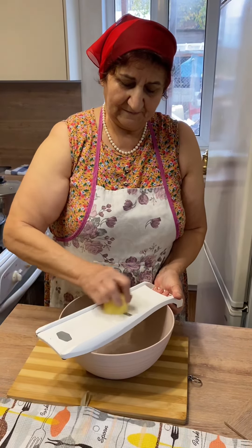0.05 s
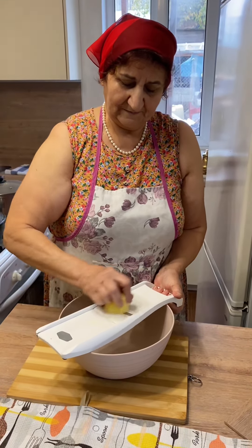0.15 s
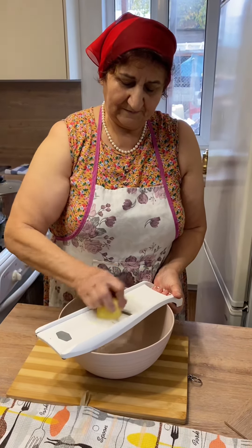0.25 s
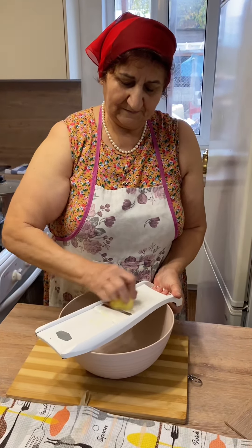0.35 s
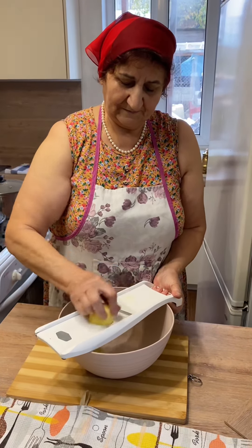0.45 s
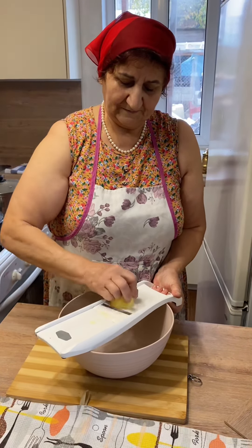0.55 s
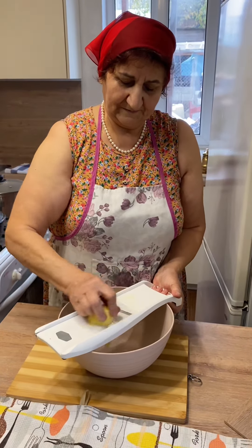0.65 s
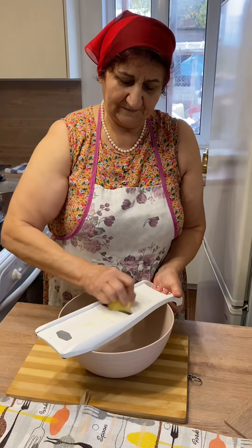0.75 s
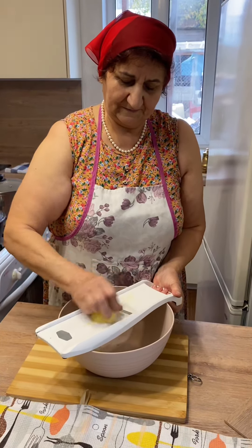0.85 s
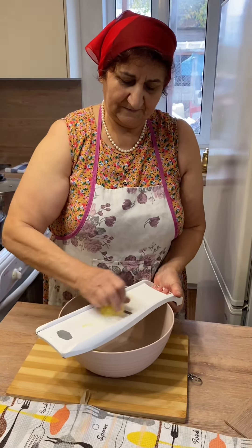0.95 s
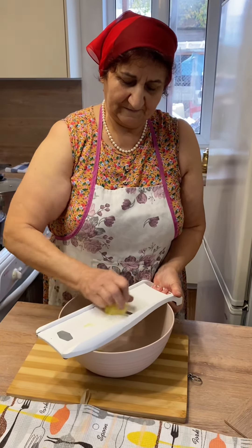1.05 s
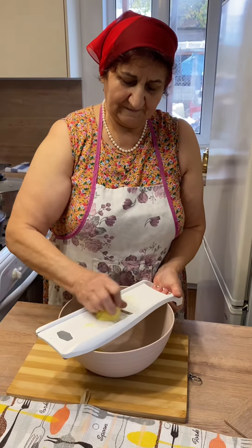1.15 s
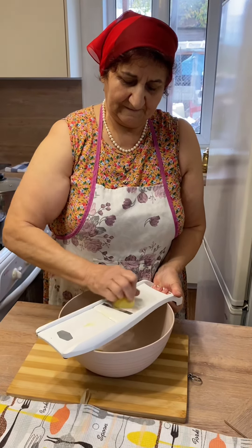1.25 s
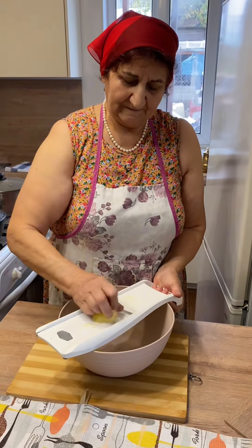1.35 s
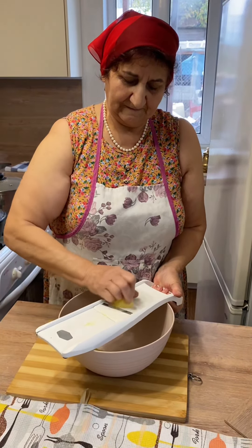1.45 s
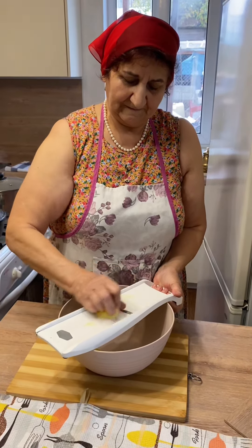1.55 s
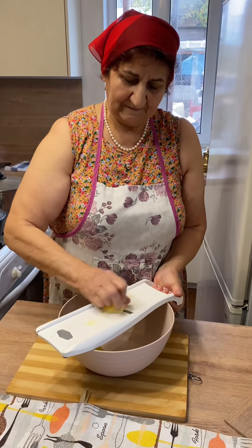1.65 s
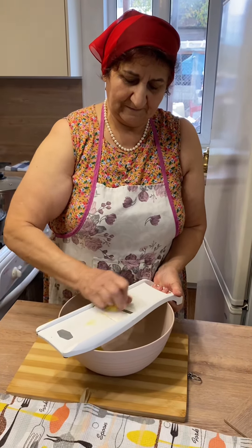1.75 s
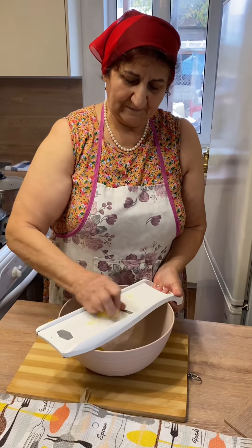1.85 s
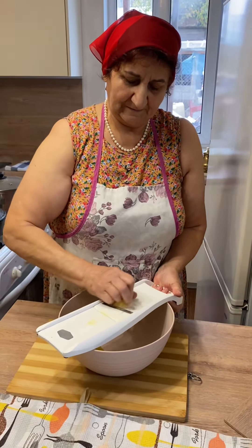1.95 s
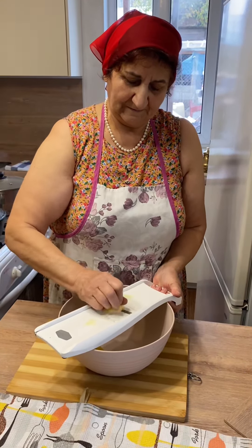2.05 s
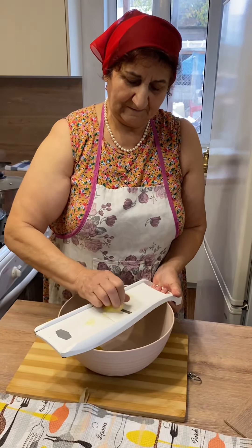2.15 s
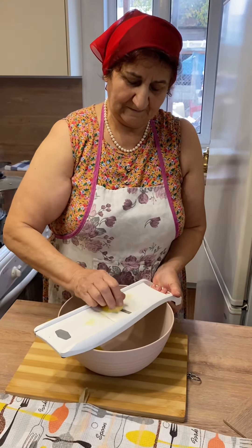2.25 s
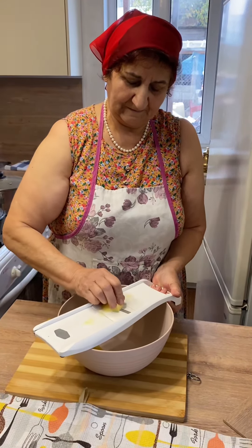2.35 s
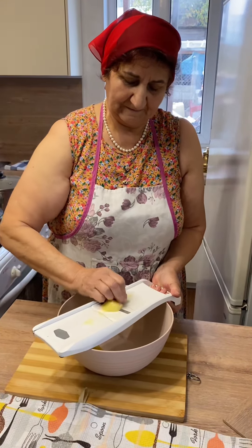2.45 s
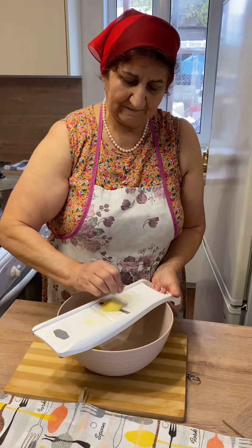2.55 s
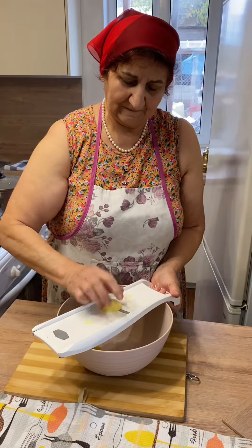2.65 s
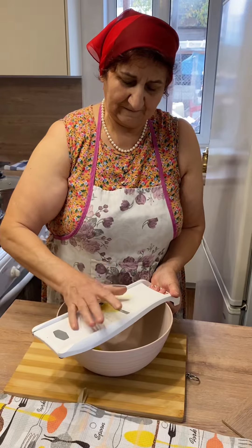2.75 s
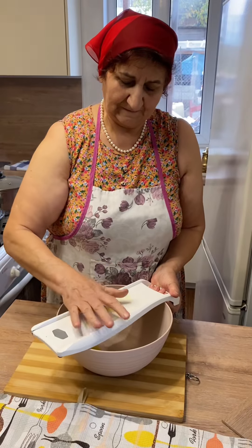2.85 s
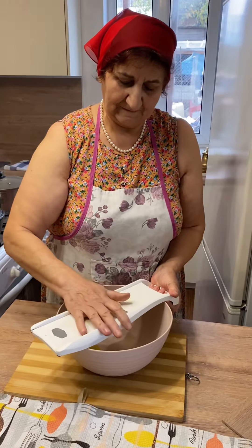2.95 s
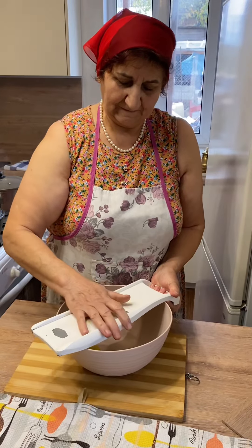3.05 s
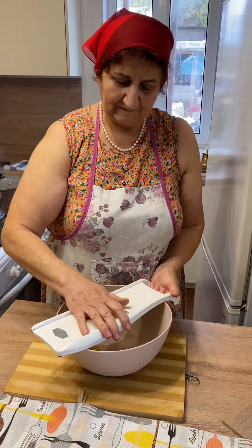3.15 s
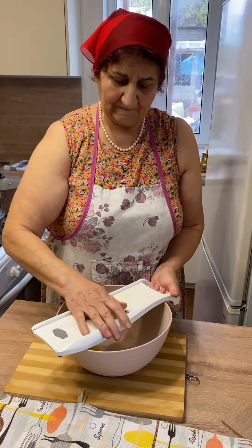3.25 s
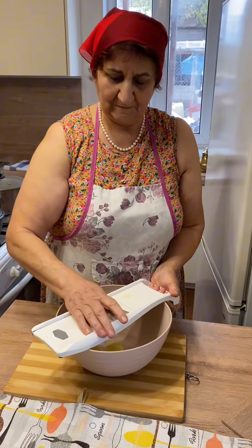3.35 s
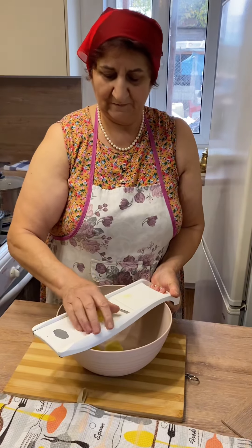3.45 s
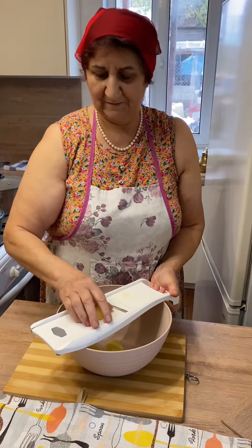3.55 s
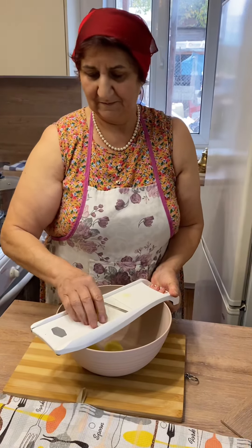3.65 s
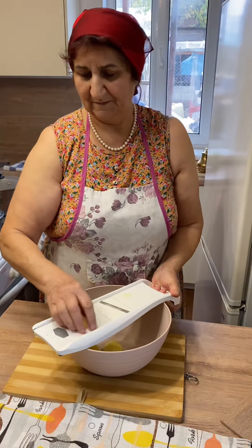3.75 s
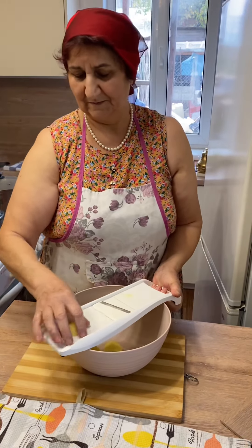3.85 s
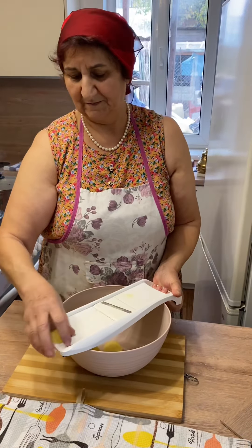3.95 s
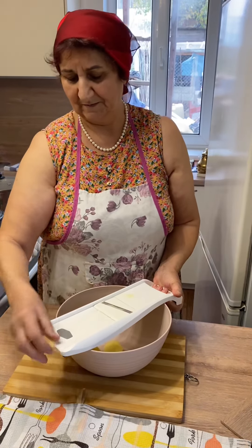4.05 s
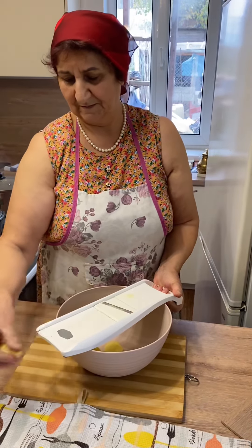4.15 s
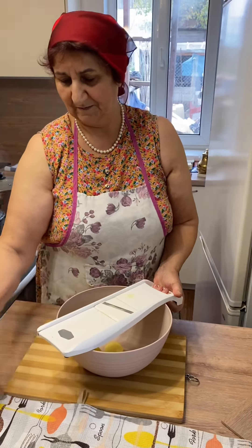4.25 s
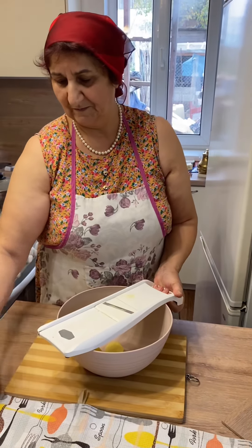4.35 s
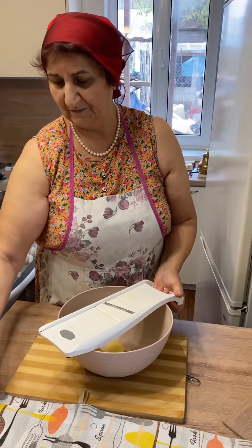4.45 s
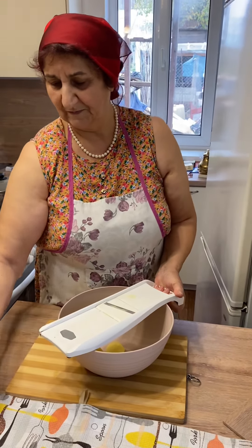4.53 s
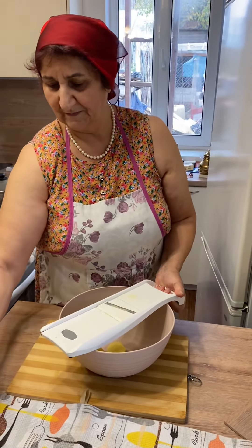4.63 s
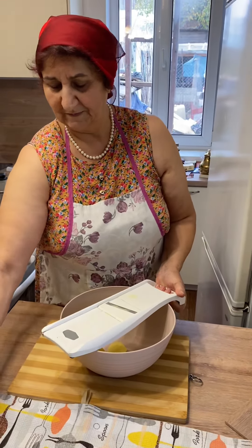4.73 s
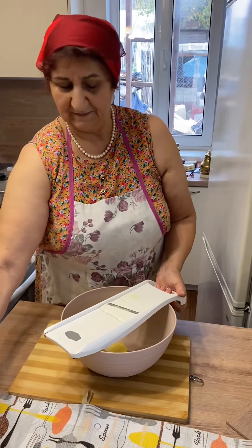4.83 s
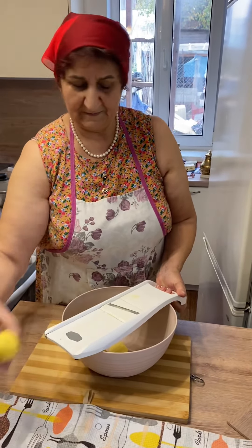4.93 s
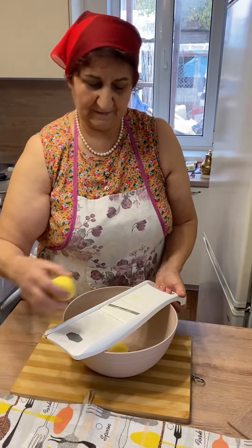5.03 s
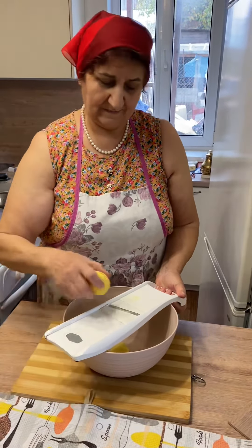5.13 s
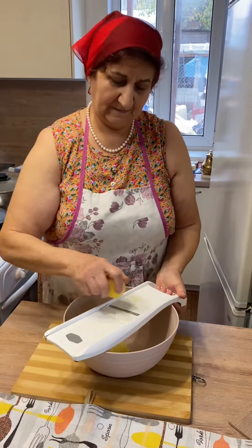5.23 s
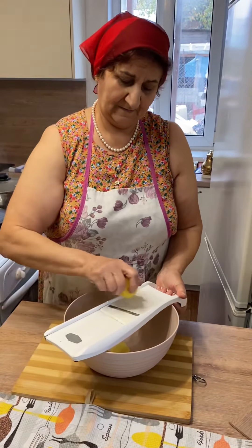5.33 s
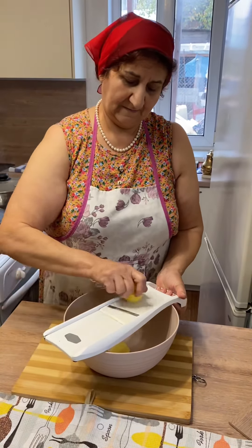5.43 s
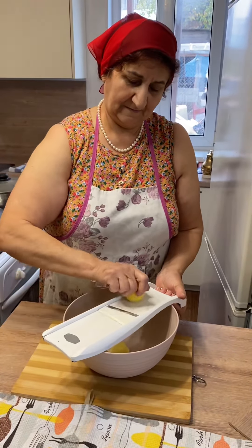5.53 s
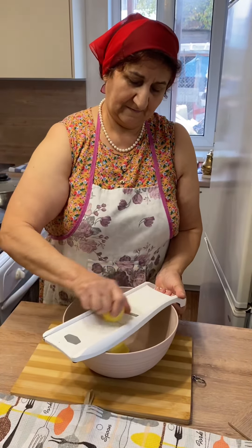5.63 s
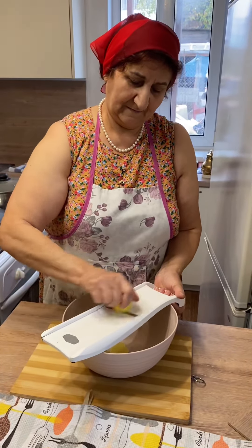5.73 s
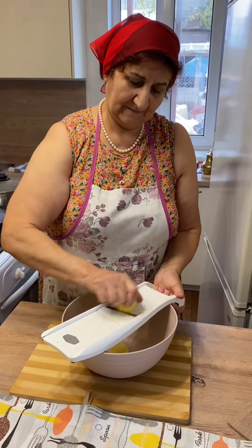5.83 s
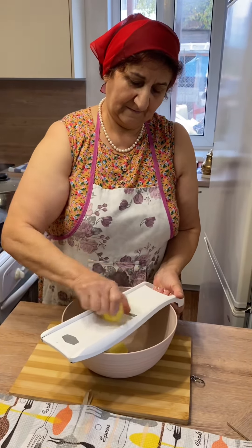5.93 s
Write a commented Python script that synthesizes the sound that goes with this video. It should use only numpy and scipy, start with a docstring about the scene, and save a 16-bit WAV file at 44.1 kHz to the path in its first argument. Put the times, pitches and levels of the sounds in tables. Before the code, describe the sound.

Fast wet scraping of a potato on a slicer knocking against a bowl, a pause with one clunk, then more slicing.

```python
"""Wet hissing strokes come first: a raw potato is rubbed fast up and down a ribbed plastic slicer that
rests on a bowl. Friction drives the modes of plate and bowl into a judder; the slicer thumps and booms
on the rim, and the blade snaps free of each slice. In a pause a hand brushes the slicer and a piece
drops into the bowl, then the strokes resume. A refrigerator hums in the small kitchen."""
import sys
import numpy as np
from scipy import signal
from scipy.fft import rfft, irfft, next_fast_len
from scipy.io import wavfile
from scipy.ndimage import uniform_filter1d, map_coordinates

SR = 44100
rng = np.random.default_rng(int(sys.argv[2]) if len(sys.argv) > 2 else 0)


def transcribe(signal):
    """Save signal, clipped to [-1, 1], as a 16-bit WAV file at the path in sys.argv[1]."""
    frames = np.atleast_2d(signal).T
    limited = np.clip(frames, -1, 1)
    pcm = np.round(limited * 32767).astype(np.int16)
    wavfile.write(sys.argv[1], SR, pcm)


N = 264159

# Event and mode levels are relative within each table.
# crisp catches, mostly the blade leaving a slice: t/s, level/dB, centre f/Hz, T60/s
BLADE_SNAPS = [(0.044, -32.5, 5560, 0.071), (0.105, -38, 5590, 0.037), (0.163, -53, 5300, 0.027),
               (0.2789, -26, 6340, 0.017), (0.383, -40, 5300, 0.027), (0.4969, -21, 6300, 0.022),
               (0.5875, -35.5, 4740, 0.038), (0.7178, -19.5, 5500, 0.026), (0.821, -34, 10100, 0.033),
               (0.9797, -41, 6330, 0.027), (1.049, -38, 5270, 0.056), (1.199, -42.5, 5530, .04),
               (1.2833, -39, 4650, 0.13), (1.482, -36, 4920, 0.028), (1.7549, -40, 5140, 0.035),
               (1.8833, -28.5, 6030, 0.036), (1.9826, -49, 5940, 0.045), (3.095, -41, 5270, 0.07),
               (3.3663, -25, 3630, 0.04), (3.7847, -45, 4680, 0.0283), (5.6127, -33, 9830, 0.024),
               (5.75, -47, 5300, 0.035), (5.854, -22, 6600, 0.041)]
# dull thumps of the slicer, from the strokes and from light handling in the pause:
# t/s, higher-mode level/dB, lower-mode level/dB, hard-edge level/dB
SLICER_THUMPS = [(0.008, -28.5, -27, -47), (0.091, -25, -41, -45), (0.112, -21.5, -37, -36),
                 (0.186, -51, -36, -47), (0.208, -26.5, -36, -57), (0.309, -31, -33, -51),
                 (0.335, -42, -25, -40), (0.362, -30, -35, -61), (0.388, -30, -31, -60),
                 (0.428, -35, -24, -45), (0.609, -36, -28, -41), (0.651, -48, -37, -53),
                 (0.773, -42, -39, -66), (0.867, -42, -30.5, -54), (0.905, -36, -27, -52),
                 (0.939, -41, -24, -47), (0.998, -44, -32, -60), (1.033, -38, -40, -64),
                 (1.107, -39, -28.5, -53.5), (1.148, -29.5, -40, -56), (1.258, -26.5, -41, -47),
                 (1.352, -38.5, -28.5, -59), (1.484, -22, -29, -42.5), (1.554, -27, -42, -57),
                 (1.719, -22, -41, -43), (1.731, -36, -33, -60.5), (1.809, -35, -45, -45),
                 (1.918, -28.5, -49, -52), (1.9452, -22, -35, -37), (1.982, -28.5, -37, -58),
                 (2.578, -62, -59, -57), (2.792, -58, -53, -54), (2.907, -43, -46, -53),
                 (3.053, -44, -40, -45), (3.309, -45, -47, -73), (5.452, -50, -36.5, -69),
                 (5.617, -33, -24, -46), (5.709, -52, -35, -66), (5.728, -46, -27, -60),
                 (5.755, -24.5, -18.5, -33), (5.764, -20.5, -30, -29), (5.776, -39, -49, -38),
                 (5.789, -42, -37, -40), (5.812, -36, -28, -44)]
# normal modes of the slicer plate and the empty bowl: f/Hz, bandwidth/Hz, level/dB
PLATE_MODES = [(225, 35, -4), (290, 22, 0), (345, 40, -3), (410, 18, -1), (480, 40, -8), (528, 14, 3),
               (573, 15, 2), (630, 50, -5), (735, 70, -9)]
UPPER_PLATE_MODES = [(800, 270, -3.5), (1176, 124, 1.5), (1303, 94, 2), (1763, 230, -3.5), (2052, 210, 1.4),
                     (2546, 140, -2), (2766, 145, -1), (3260, 2540, -9.5)]
BOWL_MODES = [(273, 59, -2.5), (377, 86, -3.5), (610, 190, -29), (894, 142, -1), (1120, 126, 2.5),
              (1247, 120, 1.5), (1327, 126, -2), (1760, 290, -4.5), (2040, 310, -3.5), (2770, 580, -1),
              (3500, 500, 6), (4460, 930, 4)]


def amp(db):
    """Amplitude ratio of a level in decibels."""
    return 10 ** (np.asarray(db) / 20)


def unit(x):
    """Normalisation to unit RMS."""
    return x / np.sqrt(np.mean(x ** 2) + 1e-20)


def along(points, hz):
    """Interpolation of (f/Hz, value) points on a logarithmic frequency axis."""
    f, value = np.transpose(points)
    return np.interp(np.log(hz + 1), np.log(f + 1), value)


def filtered(x, response):
    """Linear filtering: the spectrum is multiplied by a complex frequency response."""
    size = next_fast_len(N + SR // 2)
    return irfft(rfft(x, size) * response(np.fft.rfftfreq(size, 1 / SR)), size)[..., :N]


def tinted(x, spectrum):
    """Spectral shaping by (f/Hz, level/dB) points, at unit RMS."""
    return unit(filtered(x, lambda hz: amp(along(spectrum, hz))))


def resonant(x, modes, ratio=-1):
    """Modal superposition: mode k is weighted by ratio**k, so a positive ratio starts all in step."""
    return filtered(x, lambda f: sum(
        ratio ** k * amp(db) * 1j * f * width / (f0 * f0 - f * f + 1j * f * width)
        for k, (f0, width, db) in enumerate(modes)))


def shaken(force, gain, modes):
    """Forced vibration: the gain acts on the force, so the modes ring on after each stroke."""
    return resonant(force * gain, modes) / np.std(resonant(force[0], modes))


def wobble(knots_per_s):
    """Slow random modulation: a spline through Gaussian values."""
    knots = rng.standard_normal(int(N * knots_per_s / SR) + 4)
    return map_coordinates(knots, [np.arange(N) * knots_per_s / SR])


def grit(knots_per_s, lumpy_db):
    """Friction noise: two independent rows whose force jumps as grains catch and tear."""
    return unit(rng.standard_normal((2, N)) * amp(lumpy_db * wobble(knots_per_s)))


def patchy(x, depth_db):
    """Spectral fluctuation: narrow bands of hiss and scrape swell and sink at random, a faint flutter."""
    spectra = signal.stft(x, nperseg=512)[2]
    field = uniform_filter1d(rng.standard_normal(spectra.shape[1:]), size=3, axis=0)
    field = uniform_filter1d(field, size=4, axis=1)
    return unit(signal.istft(spectra * amp(depth_db * unit(field)), nperseg=512)[1][:, :N])


def pushes(times, db, contact_s):
    """Impact forces: one smooth pulse per contact, its area set by the level."""
    impulses, pulse = np.zeros(N), np.hanning(round(contact_s * SR) + 3)
    impulses[np.round(times * SR).astype(int)] = amp(db)
    return np.convolve(impulses, pulse / pulse.sum())[:N]


def bursts(rows, width_hz):
    """Exponentially damped noise bands, from rows of t/s, level/dB, centre f/Hz, T60/s."""
    out, t = np.zeros(N + SR), np.arange(SR // 8) / SR
    hz = np.fft.rfftfreq(len(t), 1 / SR)
    attack = 1 - np.exp(-t / .0003)
    for start, db, centre_hz, t60 in rows:
        spectrum = rfft(rng.standard_normal(len(t))) / (1 + ((hz - centre_hz) / (width_hz / 2)) ** 2)
        band = unit(irfft(spectrum, len(t)))
        out[round(start * SR):][:len(t)] += amp(db - 5 - 60 * t / t60) * attack * band
    return out[:N]


def swells(start_s, swell_s, hold_s, levels_db, fades_db_per_s):
    """Incoherent addition: events swell, hold and fade, giving one power envelope per level column."""
    t = np.arange(0, N / SR + .002, .001)
    since_top = t - (start_s + swell_s)[:, None]
    rise_db = 20 * np.minimum(since_top, 0) / np.reshape(swell_s, (-1, 1))
    fading_s = np.maximum(since_top - hold_s[:, None], 0)
    powers = [np.sum(amp(db[:, None] + rise_db - fade * fading_s) ** 2, axis=0)
              for db, fade in zip(levels_db, fades_db_per_s)]
    return np.array([np.interp(np.arange(N) / SR, t, power) for power in powers])


def contact_gains():
    """Summed powers set six amplitudes: hiss, scrape, higher and lower modes, lower and upper rocking."""
    # strokes down through the blade and lighter ones back up the ribs:
    # t/s, swell/s, hold/s, hiss level/dB, scrape level/dB
    cuts = [(.145, 0.017, 0.023, -37, -43.5), (.36, 0.025, 0.024, -37.5, -41.5),
            (.55, 0.047, 0.04, -39, -44.5), (.80, 0.018, 0.04, -39, -49.5), (1.0, 0.053, 0.04, -40, -51.5),
            (1.24, 0.077, 0.015, -38, -49.5), (1.49, 0.049, 0.027, -39.5, -48.5),
            (1.71, 0.067, 0.017, -37.5, -50), (1.94, 0.058, 0.024, -40.5, -54.5),
            (5.597, 0.014, 0.0035, -38, -49.5), (5.838, 0.014, 0.0039, -37, -44)]
    returns = [(-.03, 0.049, 0.0033, -41.5, -48), (.04, 0.052, 0.014, -38, -50.5),
               (.262, 0.035, 0.043, -44, -52), (.485, 0.018, 0.051, -44, -52),
               (.71, 0.009, 0.059, -41, -50), (.96, 0.018, 0.038, -44.5, -59),
               (1.18, 0.054, 0.029, -42.5, -55.5), (1.41, 0.059, 0.0097, -39.5, -53),
               (1.64, 0.062, 0.016, -42.5, -50), (1.87, 0.022, 0.035, -47, -51),
               (1.91, 0.032, 0.0035, -41.5, -44.5), (5.65, 0.064, 0.014, -52, -55),
               (5.74, 0.014, 0.014, -44, -44), (5.9, 0.0073, 0.043, -67, -75),
               (5.972, 0.015, .01, -38, -44)]
    # the arm's weight on the slicer: t/s, shaking hold/s, higher-mode level/dB, lower-mode level/dB,
    # rocking hold/s, lower rocking level/dB, upper rocking level/dB
    shoves = [(-.03, 0.028, -40, -35.5, 0.0073, -43, -40), (0.082, 0.14, -40.5, -41.5, 0.12, -36.5, -36.5),
              (0.311, 0.13, -40, -43, 0.079, -36.5, -31.5), (0.48, 0.021, -58, -50, 0.05, -46, -43.5),
              (0.576, 0.11, -46, -45, 0.15, -43, -53), (0.847, 0.026, -45, -55, 0.031, -45, -69),
              (0.92, 0.035, -50, -53, 0.057, -37, -40.5), (1.087, 0.015, -44, -44.5, 0.083, -44, -60),
              (1.239, 0.14, -46, -50, 0.14, -47, -46.5), (1.48, 0.1, -46, -45, 0.13, -44, -42),
              (1.701, 0.14, -46, -43.5, 0.15, -49, -38.5), (1.923, 0.061, -42, -41, 0.091, -43, -40.5),
              (2.454, 0.02, -73, -65, 0.017, -42.5, -45), (5.596, 0.29, -44.5, -51.5, 0.085, -39, -36),
              (5.734, 0.018, -37, -32, 0.011, -32.5, -36), (5.76, 0.026, -55, -55, 0.029, -28.5, -39),
              (5.85, 0.028, -44, -43, 0.075, -37, -35.5)]
    # the hand on the slicer in the pause: t/s, hold/s, level/dB for each of the first five amplitudes
    touches = [(2.192, 0.1, -96, -71.5, -56.5, -53.5, -51.5), (2.425, 0.14, -77, -68, -59, -56.5, -66),
               (2.761, 0.14, -74, -60, -61, -59, -61), (3.048, 0.13, -49, -52, -62.5, -79, -54),
               (3.306, 0.25, -67.5, -61.5, -52.5, -55.5, -54), (3.636, 0.06, -65.5, -67, -60.5, -66, -53),
               (3.752, 0.015, -51.5, -58, -56.5, -67, -51), (3.868, 0.11, -61.5, -64.5, -67, -63, -54),
               (4.287, 0.46, -68, -67, -76, -67, -61.5), (4.698, 0.1, -78, -74, -88, -69, -52.5),
               (5.115, 0.15, -72, -66, -81, -73, -63), (5.214, 0.13, -91, -61.5, -60.5, -60, -58),
               (5.438, 0.053, -79, -79, -82, -59, -41.5)]
    power = np.zeros((6, N))
    for strokes, fades_db_per_s in (cuts, (266, 280)), (returns, (820, 330)):
        start, swell_s, hold_s, *levels = np.transpose(strokes)
        power[:2] += swells(start, swell_s, hold_s, levels, fades_db_per_s)
    start, shake_s, high_db, low_db, rock_s, *rock_db = np.transpose(shoves)
    power[2:4] += swells(start, 0.0034, shake_s, (high_db, low_db), fades_db_per_s=(130, 120))
    power[4:] += swells(start, 0.03, rock_s, rock_db, fades_db_per_s=(180, 170))
    start, hold_s, *levels = np.transpose(touches)
    power[:5] += swells(start, 0.025, hold_s, levels, fades_db_per_s=[230] * 5)
    return np.sqrt(power)


def stalls(contacts, depth_db, lead_s):
    """Stick-slip: the gain sinks as sliding slows before each contact, then recovers at once."""
    time_left = np.arange(round(.08 * SR))[::-1] / SR
    dip_db = depth_db * np.exp(-time_left / lead_s)
    level_db = np.zeros(N + SR)
    for release_s, *_ in contacts:
        end = round(release_s * SR)
        level_db[max(end - len(dip_db), 0):end] -= dip_db[-end:]
    return amp(level_db[:N])


def crunch(cells_per_s, spread_db):
    """Cell rupture under the blade: a Poisson train of clicks of very uneven size."""
    bursting = rng.random(N) < cells_per_s / SR
    return unit(bursting * amp(spread_db * rng.exponential(size=N)) * rng.standard_normal((2, N)))


def wet_hiss(gain):
    """Sliding friction of wet flesh radiates broadband noise, faintly coloured by resonances."""
    # modes of the wet runway and blade: f/Hz, bandwidth/Hz, level/dB
    blade_modes = [(3480, 170, 5.5), (4570, 67, -11), (5380, 69, -13), (5800, 120, 0), (5950, 140, -2.5),
                   (9400, 93, 8.5), (11480, 71, -35)]
    # friction spectrum: f/Hz, level/dB
    hiss_spectrum = [(1500, -30), (2500, -6), (3800, -7), (5500, 0), (6700, .5), (8000, -3.5), (10000, -6),
                     (13500, -4), (15500, -9)]
    flesh = patchy(grit(450, lumpy_db=1.0), depth_db=2.8)
    flesh += amp(-12) * crunch(cells_per_s=900, spread_db=2.8)
    caught = stalls(BLADE_SNAPS, depth_db=3.5, lead_s=0.053)
    return gain * caught * tinted(flesh + amp(-9.5) * resonant(flesh, blade_modes), hiss_spectrum)


def scrape(gain):
    """Rough friction on the ribs forces the upper modes of the plate."""
    return shaken(patchy(grit(200, lumpy_db=2.5), depth_db=3.0), gain, UPPER_PLATE_MODES)


def judder(high_gain, low_gain, slowed):
    """Structure-borne vibration: uneven friction drives the plate and the bowl under it."""
    force = grit(70, lumpy_db=2.2)
    low = shaken(force, slowed * low_gain, PLATE_MODES[:4])
    high = shaken(force, slowed * high_gain, PLATE_MODES[4:])
    bowl = shaken(grit(120, lumpy_db=3.5), high_gain, BOWL_MODES[2:7])
    return low + high + amp(-14) * bowl


def rocking(gain, mode_hz, drift_rad):
    """A low mode sustained by uneven shoves wanders in amplitude and phase."""
    phase = 2 * np.pi * mode_hz * np.arange(N) / SR
    rows = [unit(amp(2.5 * wobble(35)) * np.sin(phase + drift_rad * wobble(35))) for _ in range(2)]
    return gain * np.array(rows)


def refrigerator():
    """The periodic motion of a compressor gives a line spectrum; each line wavers in level."""
    # hum lines: f/Hz, level/dB above the common level
    hum_lines = [(98, -14.5), (148, 5)]
    # common level of the lines: t/s, level/dB
    hum_level = [(2.2, -56), (2.61, -50.5), (2.74, -54.5), (3.35, -52.5), (3.64, -56.5), (4.0, -51),
                 (4.32, -57), (4.97, -52), (5.19, -60), (5.4, -55)]
    t = np.arange(N) / SR
    level_db = np.interp(t, *np.transpose(hum_level))
    hum = sum(amp(level_db + db + 1.3 * wobble(3.15)) * np.sqrt(2) * np.sin(2 * np.pi * hz * t)
              for hz, db in hum_lines)
    return hum * [[1], [.3]]


def room_tone():
    """Ambient noise has a continuous spectrum, strongest in the bass, and drifts in level."""
    # ambient spectrum: f/Hz, level/dB
    air_spectrum = [(20, -37), (50, 0.5), (95, -4.5), (200, -10.5), (500, -18), (1000, -22.5),
                    (2500, -31.5), (4000, -34), (11000, -39.5), (15000, -49)]
    # slow drift: t/s, level/dB
    room_level = [(0, -51), (2.3, -57), (3.5, -50), (4.15, -56), (4.5, -54), (4.95, -57.5), (5.3, -56.5),
                  (6, -47.5)]
    level_db = np.interp(np.arange(N) / SR, *np.transpose(room_level)) + 0.36 * wobble(5.13)
    return amp(level_db) * tinted(rng.standard_normal((2, N)), air_spectrum)


def thumps():
    """Impact excitation: a soft push rings the bowl's air and the plate, its hard edge the upper modes."""
    times, high_db, low_db, edge_db = np.transpose(SLICER_THUMPS)
    low_force = resonant(pushes(times, low_db, contact_s=0.0025), [(305, 270, 0)])
    high_force = resonant(pushes(times, high_db, contact_s=0.0012), [(581, 223, 1.5)])
    low = resonant(low_force, [(293.2, 67, 0.5), (376, 27, -9.5)], ratio=0.37)
    high = resonant(high_force, PLATE_MODES[4:], ratio=0.9)
    edge = resonant(pushes(times, edge_db, contact_s=0.00034), UPPER_PLATE_MODES)
    return amp(44) * low + amp(42) * high + amp(35.5) * edge


def snaps():
    """Sudden release of stress: the blade lets go with a broadband click and a short band of noise."""
    clicks = [(start, db + 3.0, 12000, .004) for start, db, *_ in BLADE_SNAPS]
    return bursts(BLADE_SNAPS, width_hz=3600) + bursts(clicks, width_hz=16000)


def rim_booms(rise_s=0.0075):
    """Damped oscillation: each knock on the rim builds for about a cycle and dies under the hand."""
    # slicer knocking on the bowl: t/s, level/dB, f/Hz
    rim_knocks = [(0.142, -32, 170), (0.18, -27.5, 166), (0.21, -27.5, 165), (0.339, -26.5, 155),
                  (0.365, -23.5, 161), (0.399, -31, 170), (0.43, -29, 157), (0.938, -31, 92.5),
                  (0.969, -34, 153), (1.029, -30, 151), (1.515, -33, 157), (1.571, -36, 150),
                  (1.749, -31.5, 151), (1.806, -35, 153), (1.98, -34, 165), (2.487, -39, 153),
                  (5.796, -28, 106), (5.847, -25, 143), (5.891, -25, 107)]
    out, t = np.zeros(N + SR), np.arange(SR // 8) / SR
    envelope = t / rise_s * np.exp(1 - t / rise_s)
    for start, db, hz in rim_knocks:
        out[round(start * SR):][:len(t)] += amp(db) * envelope * np.sin(2 * np.pi * hz * t)
    return out[:N]


def ticks(t60=.03):
    """Narrow-band transients are heard as small pitched ticks."""
    # ticks in the pause: t/s, level/dB, centre f/Hz
    tick_events = [(2.295, -39.5, 4870), (3.065, -38.5, 825), (3.2754, -45, 11900), (3.35, -26.5, 1810),
                   (5.256, -51, 1040), (3.937, -47, 5300)]
    return bursts([(*tick, t60) for tick in tick_events], width_hz=510)


def bowl_blows():
    """Contact time limits bandwidth: the longer a blow lasts, the duller the bowl rings."""
    # the slicer taps the rim; a piece grazes it, lands and settles: t/s, level/dB, contact time/s
    blows = [(3.061, -25, 0.0015), (3.3485, -29, 0.0007), (3.3664, -15.5, 0.00052), (3.368, -8, 0.00045),
             (3.3714, -18.5, 0.00062)]
    force = sum(pushes(np.array(start), db, contact_s) for start, db, contact_s in blows)
    return amp(28) * resonant(force, BOWL_MODES)


def kitchen(x):
    """Reverberation: convolution with a noise tail in which each frequency decays at its own rate."""
    # reverberation time: f/Hz, T60/s
    decay_times = [(200, 0.64), (1000, 0.47), (3000, 0.5), (6000, 0.47), (10000, 0.33)]
    hz, t, spectra = signal.stft(rng.standard_normal((2, SR // 2)), SR, nperseg=256)
    tail = signal.istft(spectra * amp(-60 * t / along(decay_times, hz)[:, None]), SR, nperseg=256)[1]
    delayed = np.pad(x, (200, 0))[None]
    return signal.fftconvolve(delayed, tail / np.linalg.norm(tail[0]), axes=1)[:, :N]


def scene():
    """Superposition in two rows: what both microphone ports share, and what sets them apart."""
    snap, thump, blow = snaps(), thumps(), bowl_blows()
    hiss_gain, scrape_gain, high_gain, low_gain, lower_rock, upper_rock = contact_gains()
    slowed = stalls(SLICER_THUMPS, depth_db=1.0, lead_s=0.032)
    friction = wet_hiss(hiss_gain) + scrape(slowed * scrape_gain)
    body = judder(high_gain, low_gain, slowed)
    body += rocking(lower_rock, mode_hz=100.9, drift_rad=1.12)
    body += rocking(upper_rock, mode_hz=161, drift_rad=0.77)
    reverb = kitchen(amp(-6) * snap + amp(-4.5) * thump + amp(-1.5) * blow + amp(-9.5) * friction[0])
    transients = (thump + snap + rim_booms() + ticks() + blow) * [[1], [-.15]]
    return friction + body + transients + reverb + refrigerator() + room_tone()


def record(dry):
    """Two-port pickup: partial coherence, level and phase differences, and a limited passband."""
    # likeness of the ports: f/Hz, correlation
    coherence = [(60, 1), (250, 0.97), (550, 0.64), (1000, 0.38), (2300, 0.57), (4000, 0.16), (6000, 0.63),
                 (7000, 1), (15000, 0.73)]
    # left minus right: f/Hz, level/dB
    level_difference = [(60, -2), (270, -2), (450, -3), (740, -7), (1220, -2), (2000, -1), (3300, -.5),
                        (5500, -0.5)]
    # lead of left over right: f/Hz, phase/rad
    phase_lead = [(100, 0), (600, -.4), (1030, 1), (1500, .1), (2000, .3), (2800, 2.5), (3300, .6),
                  (5000, .3), (6700, 3.1), (8200, 3.2), (9600, 6.2), (11600, 6.4), (12500, 9.4),
                  (14400, 9.5), (15300, 12.5)]
    bass_hz, top_hz = 35, 15900

    def row_weights(hz):
        angle = np.arccos(np.clip(along(coherence, hz), -1, 1)) / 2
        return np.array([np.cos(angle), np.sin(angle)])

    def port_responses(hz):
        left = amp(along(level_difference, hz) / 2) * np.exp(.5j * along(phase_lead, hz))
        passband = hz ** 2 / (hz ** 2 + bass_hz ** 2) * (hz < top_hz)
        return np.array([left, 1 / left]) * passband

    shared, apart = filtered(dry, row_weights)
    return filtered(np.array([shared + apart, shared - apart]), port_responses)


dry = scene()
out = record(dry)
transcribe(out)
```